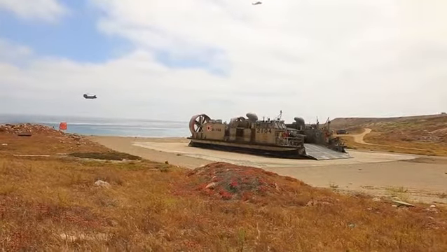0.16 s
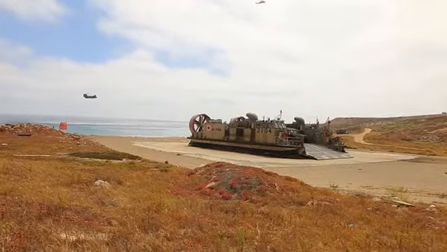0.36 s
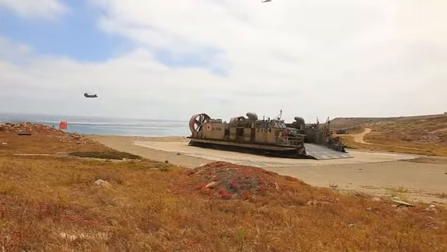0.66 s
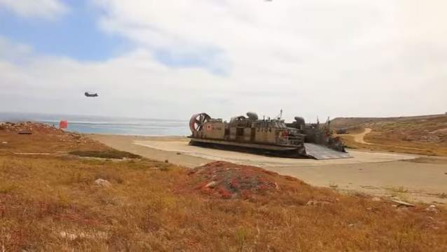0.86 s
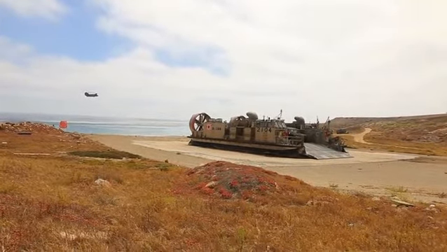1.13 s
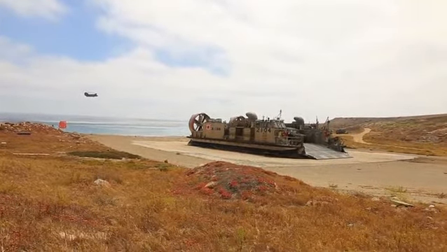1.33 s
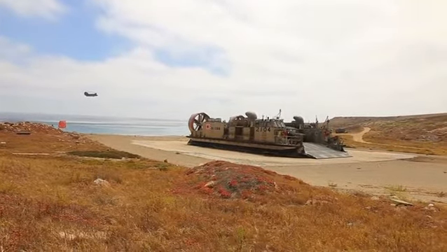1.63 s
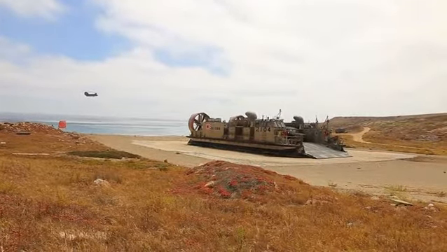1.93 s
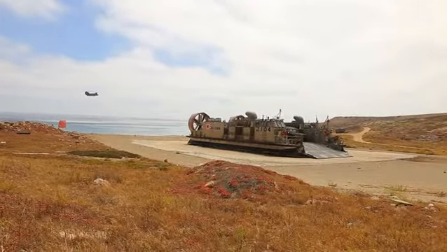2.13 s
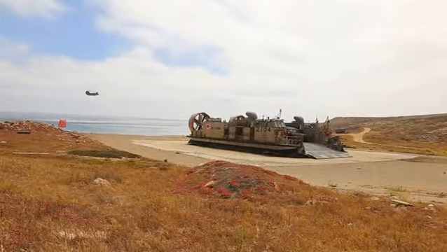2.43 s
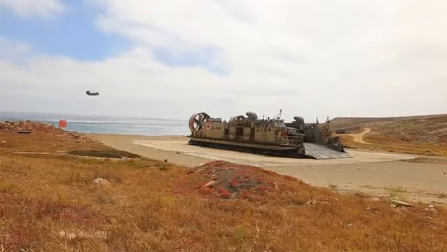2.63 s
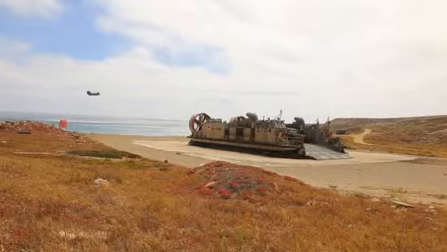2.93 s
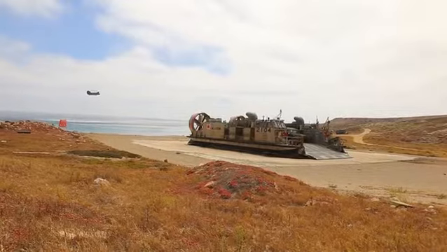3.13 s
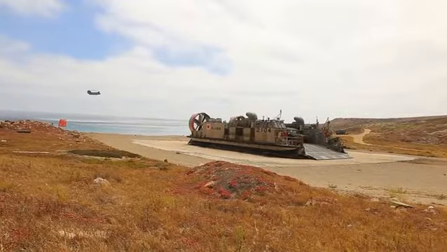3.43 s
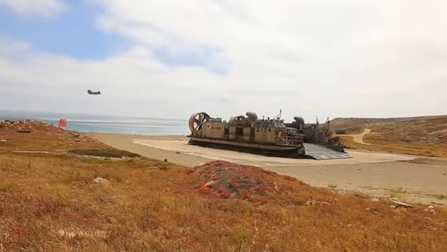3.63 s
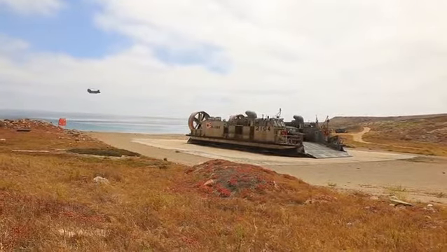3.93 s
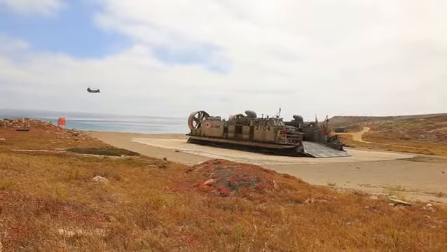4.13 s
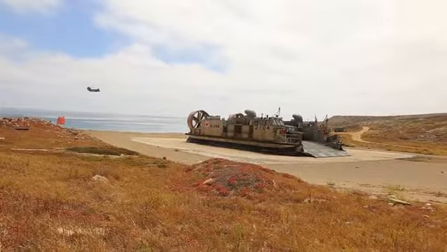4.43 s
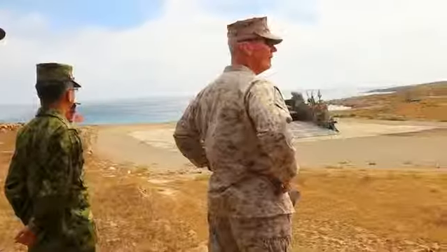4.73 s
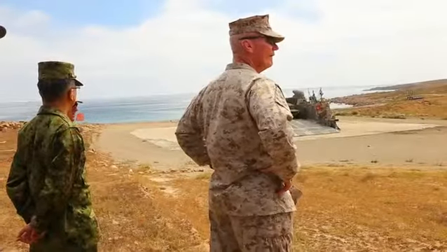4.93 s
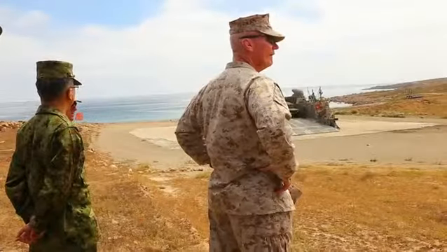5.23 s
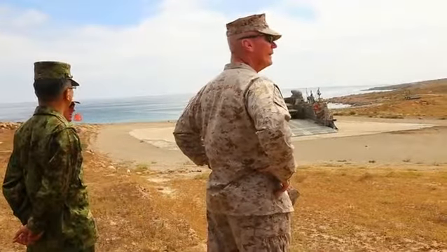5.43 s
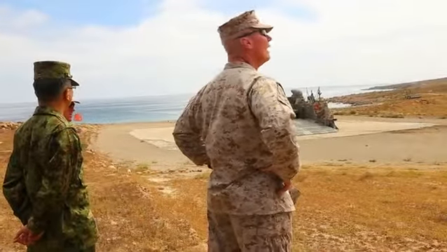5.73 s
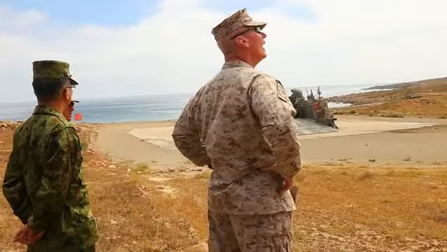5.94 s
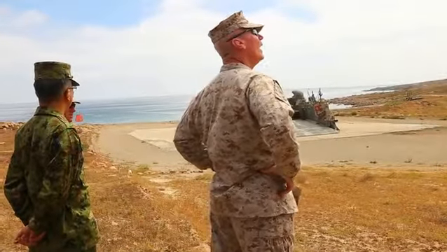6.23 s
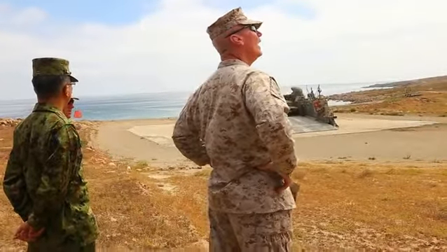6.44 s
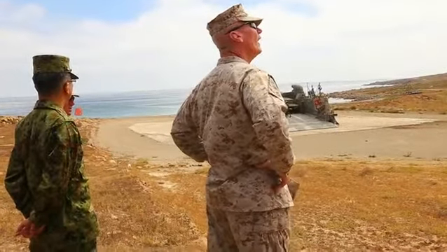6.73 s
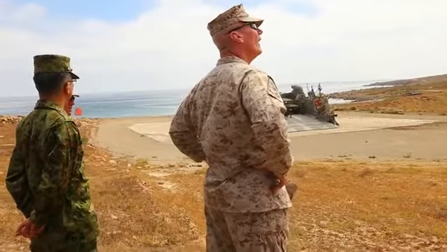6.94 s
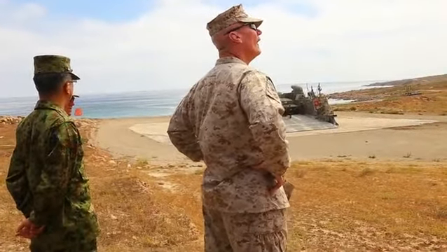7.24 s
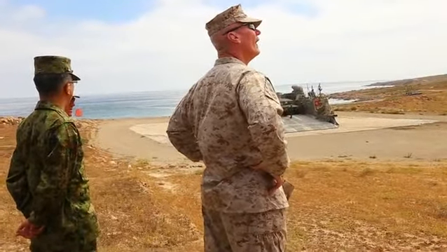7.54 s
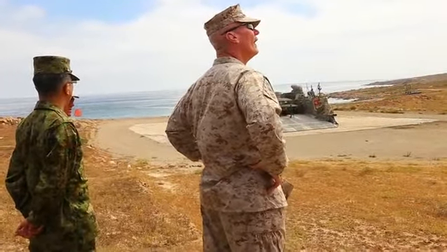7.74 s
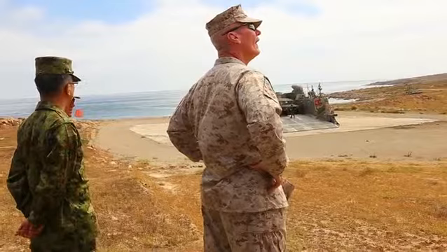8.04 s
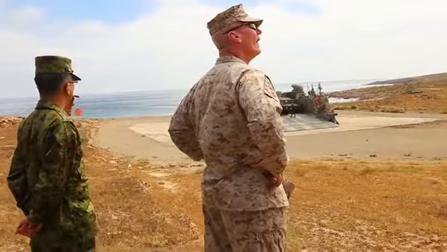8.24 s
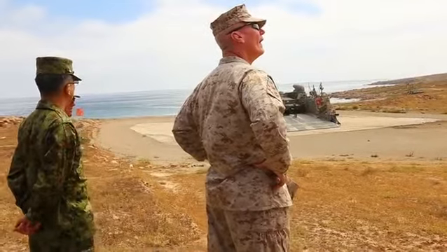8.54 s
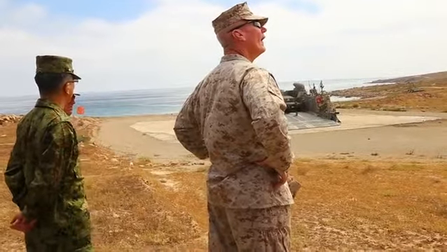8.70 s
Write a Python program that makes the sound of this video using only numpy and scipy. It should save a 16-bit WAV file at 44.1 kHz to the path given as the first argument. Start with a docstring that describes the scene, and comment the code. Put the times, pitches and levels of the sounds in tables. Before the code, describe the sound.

On an open beach, a large military hovercraft idles with broad exhaust roar, hollow fan drone and breathy high turbine whines, while a far twin-rotor helicopter beats quickly and softly below. A hard cut leaves a tiny silence. Then, from another spot, a helicopter passes close overhead with irregular heavy slaps, sharp cracks and chopped wash; the craft is duller and hissing, and downwash rumbles on the microphone.

```python
"""A hovercraft idles on a beach: noise shaped into exhaust roar, duct drone and turbine whines, plus sine tones.
Under it a far twin-rotor helicopter beats in bell-shaped pressure bursts, the rear beat echoing off the water.
After a short silence the listener stands elsewhere: a helicopter slaps close overhead with thuds, sharp cracks
and chopped rotor wash. The craft is now a dull roar of noise with hiss and one flickering high whine, and the
downwash pushes low lumps of noise onto the microphone."""
import sys
import numpy as np
from scipy import signal
from scipy.fft import rfft, irfft, next_fast_len
from scipy.io import wavfile
from scipy.ndimage import uniform_filter1d, map_coordinates

SR = 44100
rng = np.random.default_rng(int(sys.argv[2]) if len(sys.argv) > 2 else 0)


def output_pcm(signal):
    """Save a mono or channel-first signal as 16-bit PCM at the path in sys.argv[1].

    Samples are clipped to [-1, 1] before scaling.
    """
    pcm = np.clip(np.atleast_2d(signal).T, -1, 1) * 32767
    wavfile.write(sys.argv[1], SR, np.round(pcm).astype(np.int16))


N = 391145
TIME = np.arange(N) / SR  # s
SILENCE_START_S, SILENCE_END_S = 4.6475, 4.727  # the gap between the two listening places
NEAR_RATE, NEAR_PASS_S = 11.43, 6.835  # near blades a second; moment of one pass
FAR_RATE = 11.278  # beats a second of each far rotor

# The craft from the beach: (time [s], exhaust roar [dB], turbine whine [dB], upper whine over turbine whine [dB])
CRAFT_LEVELS = [(0, -23.5, -28.5, -3), (.4, -24.5, -27, -1.5), (.85, -24.5, -24.5, 0),
                (1.05, -24.5, -29.5, -0.5), (1.55, -26, -30, 2), (1.8, -24, -26, 0.5),
                (2.45, -24, -29, 0.5), (2.65, -25, -27.5, 2), (3.33, -24.5, -28, 1.5),
                (3.6, -24.5, -28.5, -1.5), (3.8, -24.5, -28.5, 2.5), (3.92, -27, -29, 10),
                (4.08, -30.5, -30.5, 8.5), (4.25, -29, -31, 4.5), (4.64, -28, -31, 6.5)]


def craft():
    """Exhaust, duct and turbines add up; gusts over the sand sway the duct and all the whines together."""
    roar_db, whine_db, upper_db = curves(CRAFT_LEVELS)
    gust_db = .7 * wobble(8) + .8 * wobble(16)
    return exhaust(roar_db) + duct(whine_db, gust_db) + turbines(whine_db, upper_db, gust_db) + shaft_tones()


# Colour of the exhaust and wash noise: (frequency [Hz], relative level per Hz [dB])
EXHAUST_COLOUR = [(20, -37.5), (40, -10.5), (90, 0), (170, -3), (260, -4), (400, -6.5), (600, -7.5),
                  (900, -7.5), (1500, -16), (2000, -32), (4000, -42.5)]


def exhaust(roar_db):
    """Roar of the exhaust and the far rotors' wash: broad low noise that pulses at twice the far beat rate."""
    pulse = np.cos(2 * np.pi * 2 * FAR_RATE * (TIME - .003))
    level_db = roar_db + 1.6 * pulse + 0.56 * wobble(12)
    return amp(level_db) * rush(colour(EXHAUST_COLOUR), patchy_db=1.0)


# Resonances of the fan duct: (centre [Hz], width [Hz], relative level [dB])
DUCT_MODES = [(1083, 125, -6), (1217, 83, -0.5), (1321, 180, -0.5)]
DUCT_DB, DUCT_FOLLOWS = -25, .35  # level before gusts and swells; share of the turbine whine's swells


def duct(whine_db, gust_db):
    """Noise ringing in the fan duct's resonances makes a drone."""
    swell_db = DUCT_FOLLOWS * (whine_db - whine_db[:SR * 4].mean())
    return amp(DUCT_DB + swell_db + 1.3 * gust_db) * rush(humps(DUCT_MODES, steep=2.12), patchy_db=-0.9)


# Broad turbine resonances: (centre [Hz], width [Hz], relative level [dB])
WHINE_MODES = [(2765, 260, -5.5), (3620, 660, -4), (2450, 630, -12.5)]
# Resonances of the upper whine: (centre [Hz], width [Hz], relative level [dB])
UPPER_WHINE_MODES = [(4810, 1230, -1.5), (5336, 180, 2.5), (6100, 490, -0.5), (6780, 320, 1.5),
                     (7345, 160, 0), (7950, 250, -7.5), (8770, 460, -14.5)]
MAIN_DB, MAIN_DB_PER_S = -5.5, 1.6  # the narrower whine: start level over the turbine whine, and its growth


def turbines(whine_db, upper_db, gust_db):
    """Turbine whines are noise in broad resonances, with a narrower one at 4110 Hz that grows against them."""
    broad = amp(whine_db + gust_db) * rush(humps(WHINE_MODES, steep=1.05), patchy_db=1.0)
    main_db = whine_db + MAIN_DB + MAIN_DB_PER_S * TIME + gust_db
    main = amp(main_db) * rush(humps([(4110, 150, 0)], steep=1.13), patchy_db=1.4)  # centre Hz, width Hz, dB
    upper_level_db = whine_db + upper_db + gust_db + .8 * wobble(6.33)
    upper = amp(upper_level_db) * rush(humps(UPPER_WHINE_MODES, steep=1.74), patchy_db=1.5)
    return broad + main + upper


# Shaft and blade tones: (frequency [Hz], rms level before wavering [dB], scale of the wavering [dB])
SHAFT_TONES = [(234.2, -31.5, 1.3), (168.5, -39, 2.5), (469, -45, 2.5), (570.4, -45, 2.5), (1034, -43, 2.5),
               (8274, -56, 2.5)]


def shaft_tones():
    """Turning shafts and blades give sine tones that waver in level and drift a little in pitch."""
    out = np.zeros(N)
    for hz, db, waver_db in SHAFT_TONES:
        level = np.sqrt(2) * amp(db + waver_db * wobble(8.4))
        out += level * np.sin(2 * np.pi * hz * TIME + 0.45 * wobble(4))
    return out


# Under the near helicopter: (time [s], rotor wash [dB], craft roar [dB], wash chop depth [dB]);
# a negative depth turns the chop over
OVERHEAD_LEVELS = [(4.73, -26, -29, -2), (4.9, -20.5, -27, 3.5), (5.17, -21.5, -31.5, 0.5),
                   (5.7, -21, -33, 2), (6.0, -20, -32, 1), (6.8, -26, -30.5, 6.5), (7.3, -27, -29.5, 9.5),
                   (7.65, -21, -28, -2), (7.9, -25.5, -29, 5), (8.43, -20.5, -26, 3.5),
                   (8.7, -25, -29.5, 1), (8.87, -24.5, -26.5, 7)]
# Colour of the rotor wash: (frequency [Hz], relative level per Hz [dB])
WASH_COLOUR = [(50, -36), (90, -8.5), (130, -3.5), (180, -1), (285, 0), (370, -8.5), (480, -10.5),
               (700, -53)]
THUD_S, THUD_SPREAD_HZ = 0.0045, 24.4  # base length before scatter and shortening; pitch scatter


def near_rotor(times, thud_db, crack_db):
    """Close overhead, slaps are low thuds in puffs of noise, over a deep blade-rate thump and chopped wash."""
    chance = rng.random((len(times), 2))
    hz = blade(times)[3] + THUD_SPREAD_HZ * rng.standard_normal(len(times))
    # slaps with a loud crack pack their energy into a shorter, taller spike
    hard_db = np.clip(crack_db + 13.5, 0, 7)
    length = THUD_S * (0.68 + .4 * chance[:, 0]) * amp(-hard_db)
    thuds = bursts(times, thud_db + .4 * hard_db, length, hz, chance[:, 1])
    thuds += bursts(times, thud_db - 12.0, 0.0064, 0.41 * hz, chance[:, 0])  # a deeper push under each thud
    puff_noise = unit(filtered(rng.standard_normal(N), colour(ROAR_COLOUR)))
    puffs = bursts(times, thud_db - 14.0, 0.0079) * puff_noise

    passes = NEAR_PASS_S + np.arange(-25, 25) / NEAR_RATE
    thump_db, lag = blade(passes)[:2]
    thump_db = thump_db + 1.1 * rng.standard_normal(len(passes))
    thump = bursts(passes + lag, thump_db, 0.0092, hz=53.3, turn=0.52)

    wash_db, _, depth_db = curves(OVERHEAD_LEVELS)
    wash_level = amp(wash_db + depth_db * chop() + 2.6 * wobble(30))
    return thuds + puffs + thump + wash_level * rush(colour(WASH_COLOUR), patchy_db=-0.1)


# Individually timed blade slaps, loud and weak: (time [s], thud level [dB], crack level [dB])
TIMED_SLAPS = [(4.738, -10.5, -17), (4.911, -13, -31), (5.087, -8.5, -5), (5.103, -17, -19),
               (5.236, -13.5, -21.5), (5.266, -7, -14.5), (5.344, -7, -18), (5.378, -14, -7.5),
               (5.4, -6.5, -1), (5.485, -18, -11), (5.75, -15, -8), (5.763, -7, -5.5), (5.807, -14, -17),
               (5.878, -11, -21), (5.956, -11, -1.5), (5.977, -10.5, -7.5), (6.135, -15, -9.5),
               (6.332, -10, -22), (6.39, -16, -9), (6.471, -11.5, -22), (6.659, -10, -15),
               (6.675, -18, -18), (7.214, -12.5, -15), (7.345, -19, -20), (7.366, -20, -22),
               (7.53, -9, -14), (7.565, -8.5, -2), (7.582, -9.5, -2), (7.621, -9, -9), (7.693, -12, -13.5),
               (7.743, -12.5, -20.5), (7.972, -15, -4.5), (8.061, -10, -16), (8.078, -12.5, -13),
               (8.238, -9.5, -9.5), (8.368, -12.5, -16), (8.424, -12, -6.5), (8.588, -9.5, -10.5),
               (8.672, -7.5, -18)]
CRACK_UNDER_DB, HALFWAY_DB = -6.5, -10  # ordinary crack against its thud; second rotor's slap between passes
SCATTER_DB, SCATTER_S = 1.5, 0.00299  # scatter of level and of time
PAIR_S = (-.013, 0.00496)  # an ordinary slap lands as two close blows, this far from the pass


def slaps():
    """Timed slaps, and scattered pairs of blows at each blade pass and, weaker, halfway: time, thud, crack."""
    turn = np.repeat(np.arange(-48, 47), 2)  # half passes, two blows each
    chance = rng.standard_normal((len(turn), 3))
    passes = NEAR_PASS_S + turn / (2 * NEAR_RATE)
    thud_db = blade(passes)[2] + HALFWAY_DB * (turn % 2) + SCATTER_DB * chance[:, 1]
    times = passes + np.resize(PAIR_S, len(turn)) + SCATTER_S * chance[:, 0]
    times = np.maximum(times, SILENCE_END_S)
    crack_db = thud_db + CRACK_UNDER_DB + SCATTER_DB * chance[:, 2]
    ordinary = np.c_[times, thud_db, crack_db]
    # a timed slap takes the place of ordinary blows whose pass is close to it
    free = np.abs(passes[:, None] - np.transpose(TIMED_SLAPS)[0]).min(axis=1) > .024
    return np.r_[TIMED_SLAPS, ordinary[free]].T


# Near blades before scatter: (time [s], deep thump level [dB], thump lag behind the pass [s],
# ordinary slap level [dB], pitch of the slap's thud [Hz])
BLADE_TABLE = [(4.73, -17, .012, -14.5, 241), (5.2, -20, 0.0093, -20.5, 235),
               (5.9, -21.5, 0.0025, -15, 242), (6.4, -23, -.009, -14.5, 250), (6.9, -24, -.008, -12, 280),
               (7.4, -22.5, -0.0011, -15.5, 260), (7.9, -22, -0.01, -13.5, 244),
               (8.87, -21.5, -.006, -13.5, 245)]


def blade(times):
    """The near blades' thump level, lag, slap level and thud pitch, changing smoothly between table times."""
    when, *columns = np.transpose(BLADE_TABLE)
    return [np.interp(times, when, c) for c in columns]


# Colour of the crack noise: (frequency [Hz], relative level per Hz [dB])
CRACK_COLOUR = [(300, -2.5), (500, 6.5), (800, -13), (1500, -16.5), (3000, -34), (6000, -31)]
# Colour of the crack's bright edge: (frequency [Hz], relative level per Hz [dB])
EDGE_COLOUR = [(900, -5), (1600, 4), (2600, -21), (4500, -22.5), (7000, -29)]
CRACK_LEAD_S, EDGE_DB = 0.00388, -28.5  # noise onset ahead of the slap; mean edge level against the crack


def cracks(times, crack_db):
    """Vortex strikes: a sharp pressure spike, then noise that dies in a few ms, its bright edge sooner."""
    onset, t = times - CRACK_LEAD_S, np.arange(2048) / SR
    spike_hz = 620 + 150 * rng.standard_normal(len(onset))
    out = bursts(onset + 0.00194, crack_db - 3.0, 0.00045, spike_hz, rng.random(len(onset)))
    edge_db = crack_db + EDGE_DB + 4 * rng.standard_normal(len(onset))
    # t60: seconds for the noise to fall by 60 dB
    for level_db, spectrum, t60 in [(crack_db - 8.0, CRACK_COLOUR, .05), (edge_db, EDGE_COLOUR, .022)]:
        strikes = np.bincount(np.round(onset * SR).astype(int), amp(level_db), N)
        decay = amp(-60 * t / t60) * (1 - np.exp(-t / 0.00034))
        envelope = signal.fftconvolve(strikes, decay)[:N]
        out += envelope * unit(filtered(rng.standard_normal(N), colour(spectrum)))
    return out


# Two thin ticks in the treble: (time [s], level before a 7 dB cut [dB])
TREBLE_TICKS = [(5.906, -23), (5.9454, -24)]


def ticks():
    """Short bell-shaped puffs of high noise around 7900 Hz."""
    times, db = np.transpose(TREBLE_TICKS)
    noise = unit(filtered(rng.standard_normal(N), humps([(7900, 1300, 0)], steep=2)))
    return bursts(times + .002, db - 7, .0022) * noise


# Colour of the dull roar, shared by the slap puffs: (frequency [Hz], relative level per Hz [dB])
ROAR_COLOUR = [(250, -26.5), (470, -3), (650, -6.5), (1000, -11.5), (1300, -17.5), (1900, -20),
               (3000, -34.5)]
# Colour of the hiss: (frequency [Hz], relative level per Hz [dB])
HISS_COLOUR = [(1200, -15), (2500, -4), (4000, -8), (5400, -11), (6500, -5.5), (7500, -4.5), (9000, -13),
               (10800, -17.5)]
# The high whine before its quick wavering: (time [s], level [dB])
FLICKER_LEVELS = [(4.75, -36.5), (4.93, -49), (5.03, -36), (5.17, -56), (5.25, -39.5), (5.45, -40),
                  (5.75, -56), (5.93, -35), (6.05, -50.5), (6.3, -51), (6.38, -40.5), (6.8, -42),
                  (7.05, -51), (7.45, -42), (8.0, -47), (8.3, -37), (8.55, -44.5), (8.87, -44.5)]
HISS_DB, HISS_FOLLOWS = -37.5, 0.61  # mean level; share of the roar's swells
FLICKER_HZ, FLICKER_SAG_HZ_PER_S, FLICKER_WANDER_HZ = 7330, 35, 40  # start pitch; fall; scale of the wander


def craft_afar():
    """The craft from the second spot: noise roar and hiss, a wandering whine, and chirps in step with the blades."""
    roar_db, whine_db = curves(OVERHEAD_LEVELS)[1], curves(FLICKER_LEVELS)[0]
    sag_hz = FLICKER_SAG_HZ_PER_S * (TIME - SILENCE_END_S)
    whine_hz = FLICKER_HZ - sag_hz + FLICKER_WANDER_HZ * wobble(6.5)
    roar_level = amp(roar_db + 0.41 * chop() + 0.43 * wobble(12))
    out = roar_level * rush(colour(ROAR_COLOUR), patchy_db=1.5)
    swell_db = HISS_FOLLOWS * (roar_db - roar_db[-SR * 4:].mean())
    out += amp(HISS_DB + swell_db + 0.81 * wobble(13)) * rush(colour(HISS_COLOUR), patchy_db=1.5)
    out += amp(whine_db + 2.7 * wobble(25)) * narrow(whine_hz, width_hz=130)
    chirp_level = amp(-55.0 + 11.3 * chop(lag=0.022) + 2.6 * wobble(9.8))
    return out + chirp_level * narrow(7720 + 120 * wobble(8), width_hz=130)


# Far helicopter before scatter: (time [s], front rotor level [dB], rear rotor level [dB], rear echo delay [s])
FAR_ROTOR_LEVELS = [(0, -15.5, -19.5, 0.0086), (.6, -15, -20.5, 0.0072), (1.2, -10, -17, 0.0057),
                    (1.8, -13.5, -19.5, 0.0066), (2.4, -15, -22.5, 0.0068), (3, -16, -20.5, 0.0083),
                    (3.6, -34, -16.5, 0.0134), (4.2, -17, -18, 0.015), (4.64, -14, -17.5, 0.014)]


def far_rotors():
    """Two meshing rotors beat in turn over a shared thump; the rear beat comes twice, once off the water."""
    passes = np.arange(54) / FAR_RATE
    when, front_db, rear_db, echo_delay = np.transpose(FAR_ROTOR_LEVELS)
    chance = rng.standard_normal((len(passes), 6))
    front = passes + 0.0027 + 0.00028 * chance[:, 0]
    front_level = np.interp(passes, when, front_db) + 1.8 * chance[:, 1]
    out = bursts(front, front_level, 0.0033, hz=135, turn=-0.27)

    rear = passes + .0415 + 0.00085 * chance[:, 2]
    rear_level = np.interp(passes, when, rear_db)
    out += bursts(rear, rear_level + 1.5 * chance[:, 3], 0.0069, hz=157, turn=0.69)
    echo = rear + np.interp(passes, when, echo_delay) + 0.00043 * chance[:, 4]
    out += bursts(echo, rear_level - .8 + 1.3 * chance[:, 5], 0.0033, hz=147, turn=-0.16)

    both = np.r_[passes, passes + .5 / FAR_RATE]
    return out + bursts(both + 0.003, np.full(len(both), -25.5), 0.013, hz=83.6, turn=0.37)


# Colour of the downwash on the microphone: (frequency [Hz], relative level per Hz [dB])
BUFFET_COLOUR = [(22, -8), (45, -8.5), (75, -2), (115, -3), (170, -12)]


def wind():
    """Low lumps of downwash noise on the microphone, pushed by each blade."""
    level = amp(-33.5 + 1.5 * chop() + 1.1 * wobble(19))
    return level * unit(filtered(rng.standard_normal(N), colour(BUFFET_COLOUR)))


def chop(lag=0):
    """Swings from -1 to 1 once for each near blade, lag s after it."""
    return np.cos(2 * np.pi * NEAR_RATE * (TIME - NEAR_PASS_S - lag))


def bursts(times, db, length, hz=0, turn=0):
    """Bell-shaped pressure bursts (length in s), each swinging at hz from a phase of turn cycles."""
    t = np.arange(-2048, 2048) / SR
    at = np.round(np.asarray(times) * SR).astype(int)[:, None] + np.arange(-2048, 2048)
    bell = np.exp(-.5 * (t / np.reshape(length, (-1, 1))) ** 2)
    swing = np.cos(2 * np.pi * (np.reshape(hz, (-1, 1)) * t + np.reshape(turn, (-1, 1))))
    keep = (at >= 0) & (at < N)
    return np.bincount(at[keep], (amp(db)[:, None] * (bell * swing))[keep], N)


def rush(response, patchy_db):
    """Noise of rms 1 whose gain varies randomly in patches of time and frequency."""
    z = signal.stft(rng.standard_normal(N), nperseg=512)[2]
    field = uniform_filter1d(rng.standard_normal(z.shape), size=6, axis=0)  # smooth over frequency
    field = uniform_filter1d(field, size=10, axis=1)  # smooth over time
    patchy = signal.istft(z * amp(patchy_db * unit(field)), nperseg=512)[1][:N]
    return unit(filtered(patchy, response))


def narrow(hz, width_hz):
    """A fuzzy line of noise that follows hz: a sine multiplied by slow noise."""
    spread = unit(filtered(rng.standard_normal(N), lambda f: 1 / (1 + (f / width_hz) ** 2)))
    return np.sqrt(2) * spread * np.sin(2 * np.pi * np.cumsum(hz + np.zeros(N)) / SR)


def humps(modes, steep):
    """Gain of broad resonances that add in power; steep sets how fast their skirts fall."""
    def gain(hz):
        power = 0
        for centre, width, db in modes:
            detune = (hz * hz - centre * centre) / (hz * width + 1)
            power = power + amp(2 * db) / (1 + detune ** 2) ** steep
        return np.sqrt(power)
    return gain


def colour(points):
    """Gain drawn through (Hz, dB) points on a log frequency axis, shut off outside them."""
    f, db = np.transpose(points)
    return lambda hz: amp(np.interp(np.log(hz + 1), np.log(f + 1), db, left=-120, right=-120))


def filtered(x, response):
    """x with its spectrum multiplied by a response of frequency."""
    m = next_fast_len(N + 8192)
    return irfft(rfft(x, m) * response(np.fft.rfftfreq(m, 1 / SR)), m)[..., :N]


def wobble(rate):
    """A smooth random curve, rate knots a second."""
    return map_coordinates(rng.standard_normal(int(N * rate / SR) + 4), [np.arange(N) * rate / SR])


def curves(rows):
    """One value per sample for each column after the time."""
    when, *columns = np.transpose(rows)
    return [np.interp(TIME, when, c) for c in columns]


def amp(db):
    """Decibels to amplitude."""
    return 10 ** (np.asarray(db) / 20)


def unit(x):
    """x scaled to rms 1."""
    return x / np.sqrt(np.mean(x ** 2) + 1e-20)


def scene():
    """The beach with the craft and far rotors, a short silence, then the spot under the near helicopter."""
    before = TIME < SILENCE_START_S
    after = np.clip((TIME - SILENCE_END_S) / .0015, 0, 1)
    times, thud_db, crack_db = slaps()
    beach = craft() + far_rotors()
    under = near_rotor(times, thud_db, crack_db) + ticks() + cracks(times, crack_db) + wind() + craft_afar()
    return (beach * before + under * after)[None]


def record(dry):
    """The microphone drops the deepest bass (below about 32 Hz); nothing passes above 9870 Hz."""
    return filtered(dry, lambda hz: (hz < 9870) / np.sqrt(1 + (32 / (hz + 1)) ** 4))


dry = scene()
out = record(dry)
output_pcm(out)
```